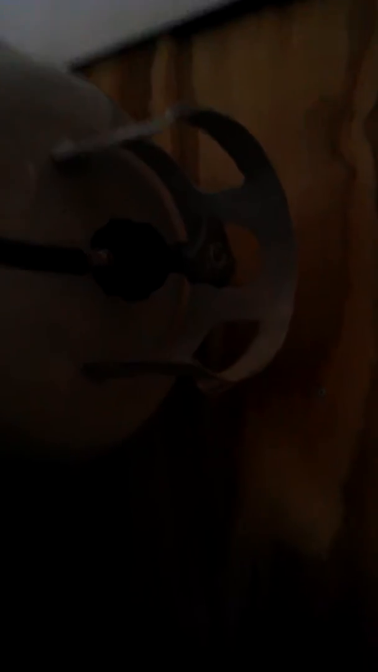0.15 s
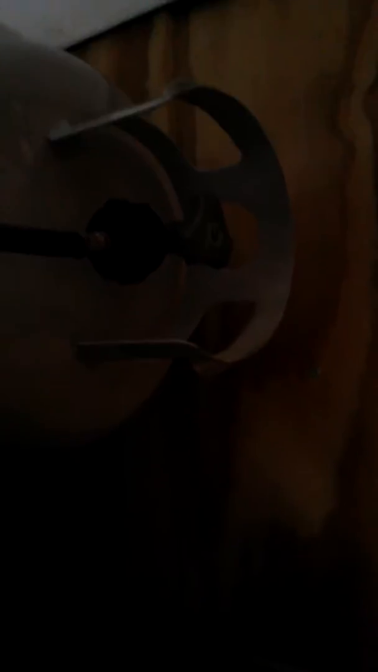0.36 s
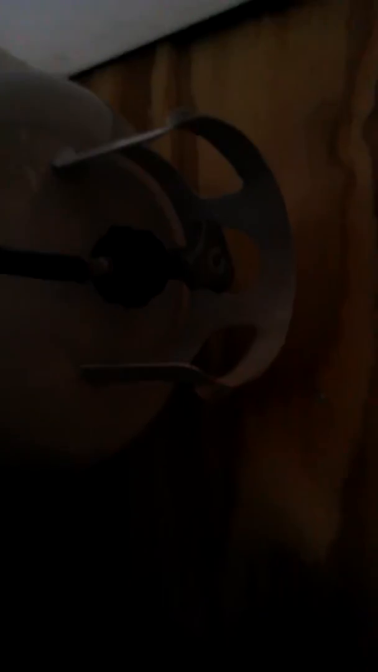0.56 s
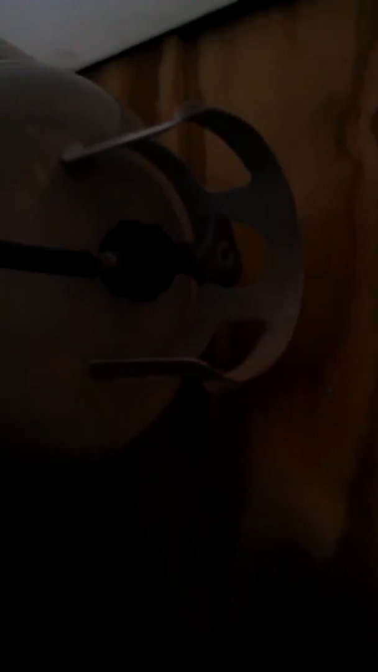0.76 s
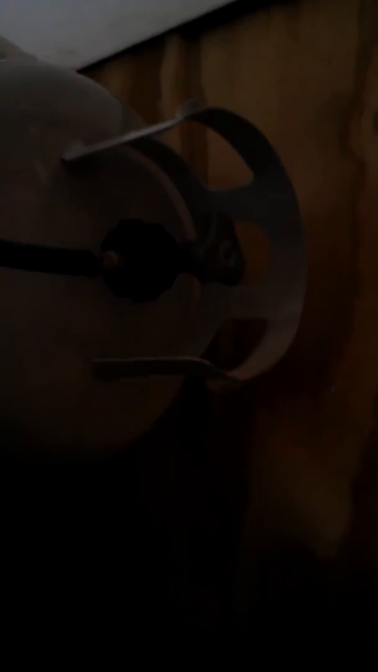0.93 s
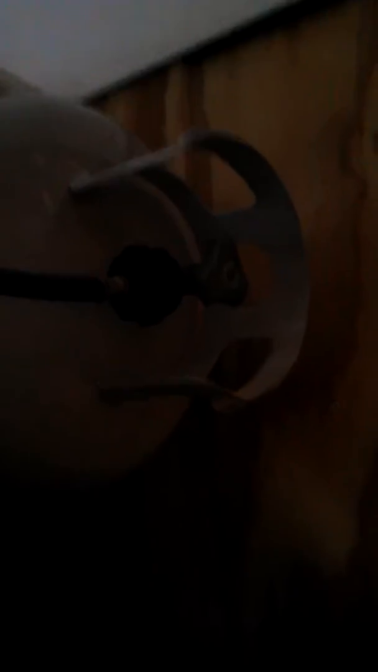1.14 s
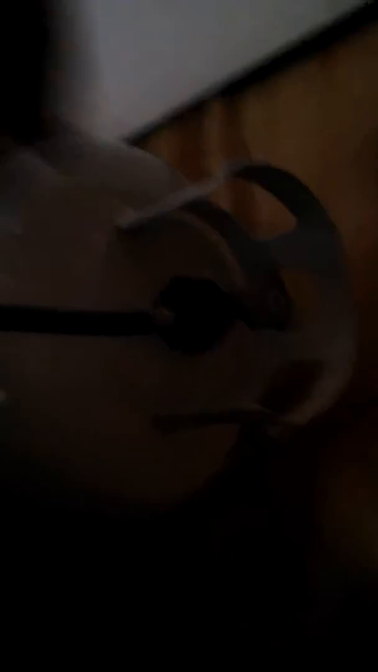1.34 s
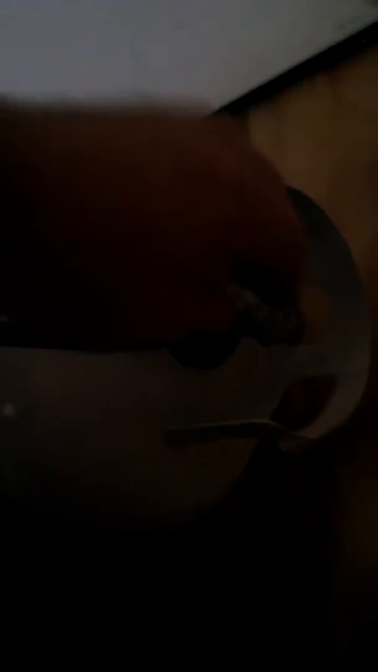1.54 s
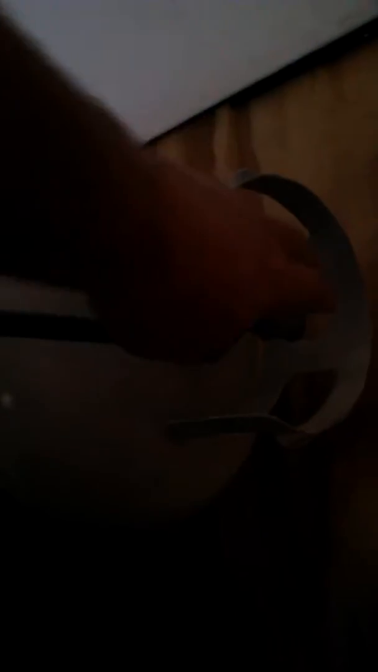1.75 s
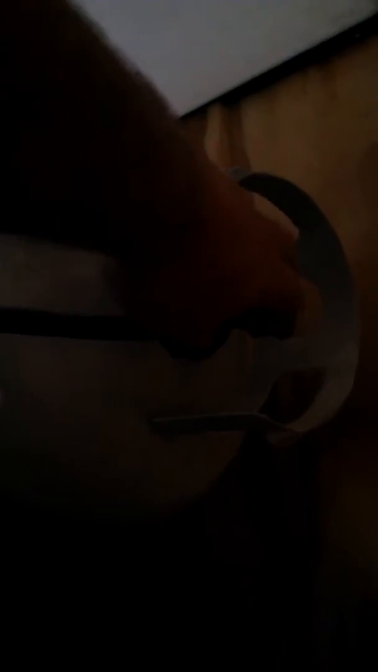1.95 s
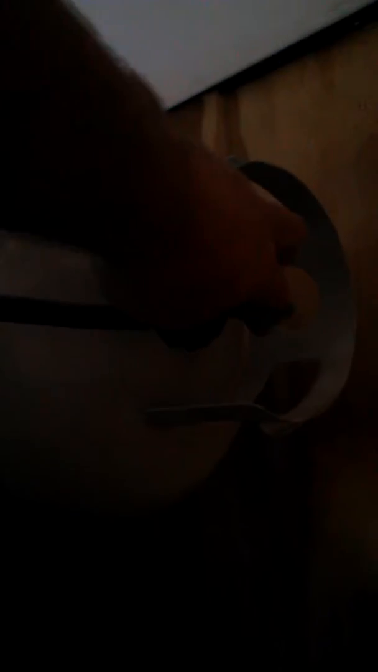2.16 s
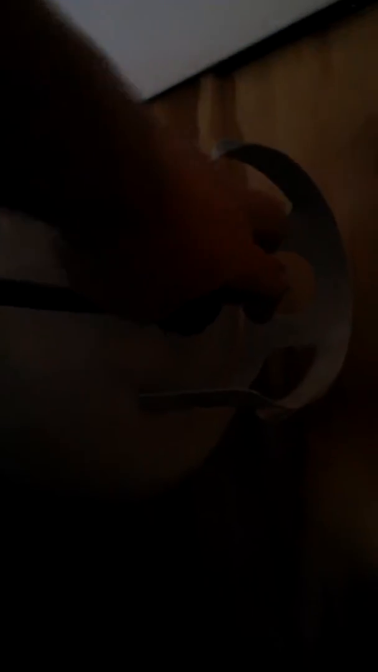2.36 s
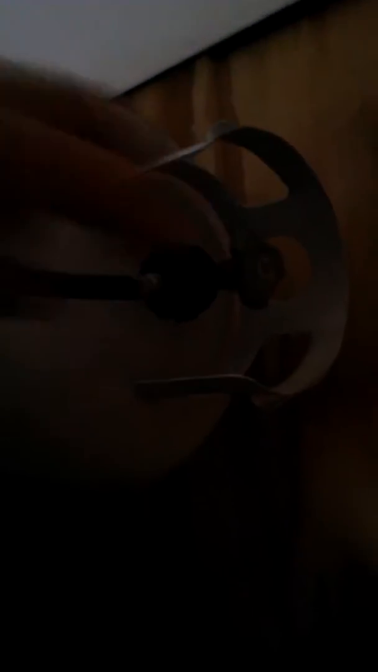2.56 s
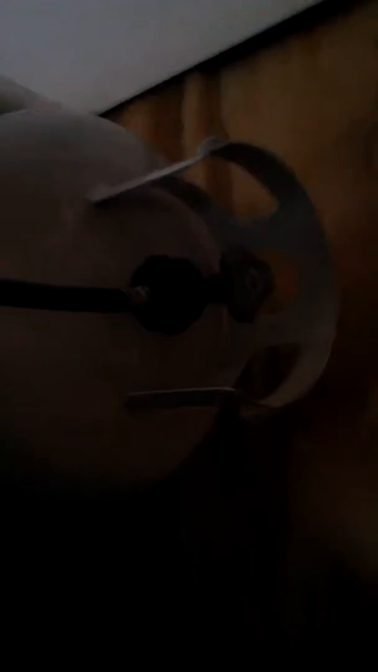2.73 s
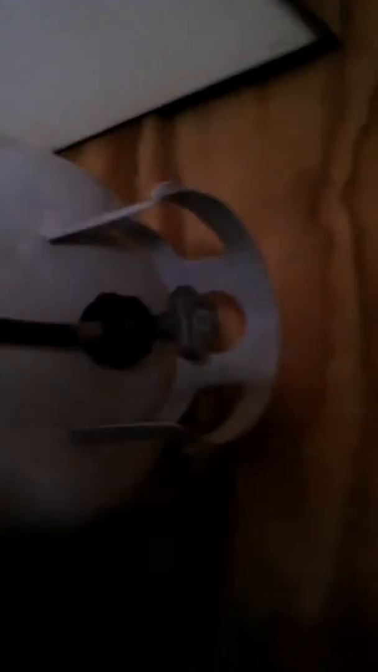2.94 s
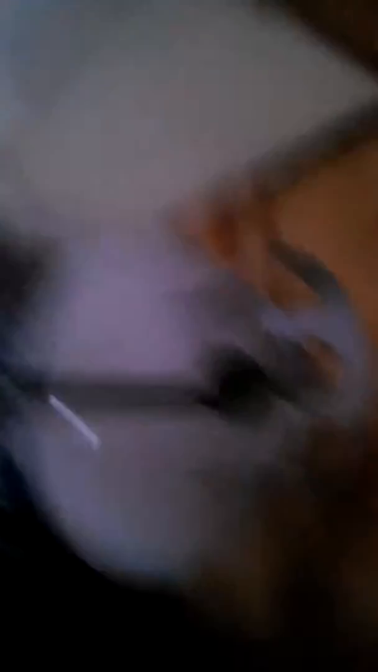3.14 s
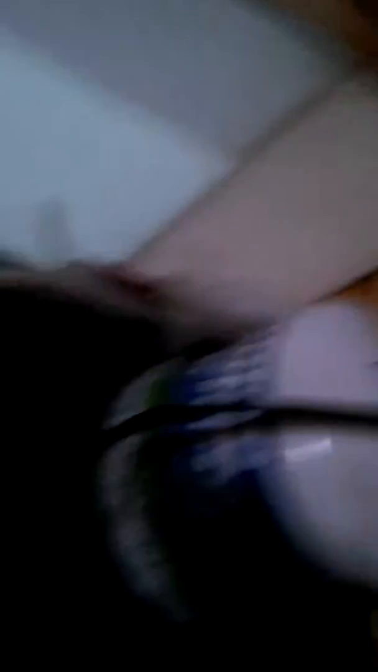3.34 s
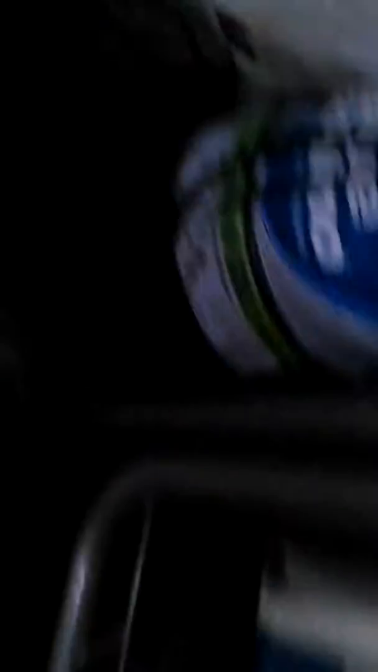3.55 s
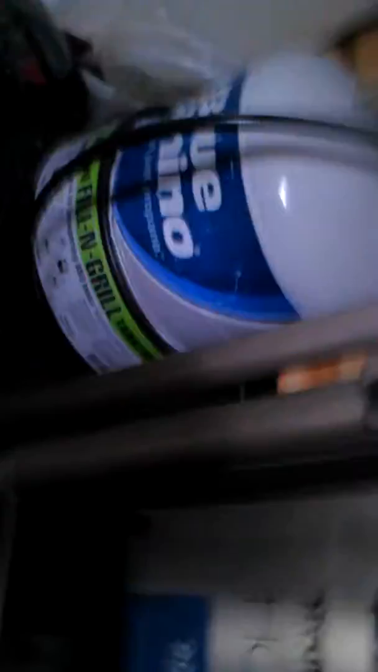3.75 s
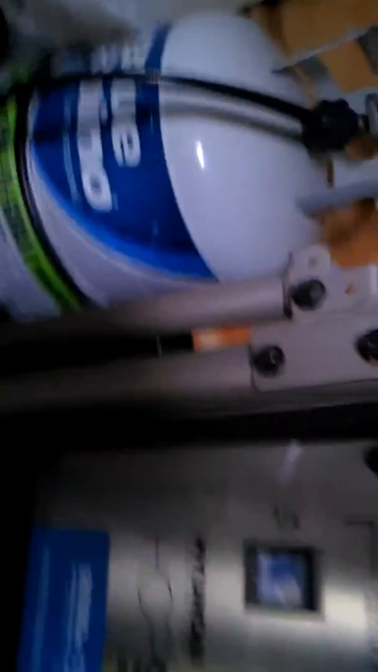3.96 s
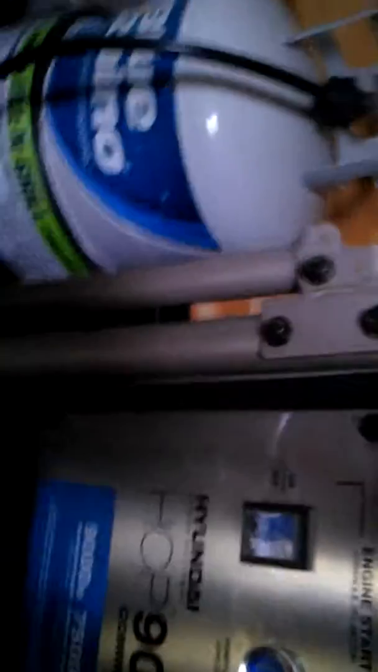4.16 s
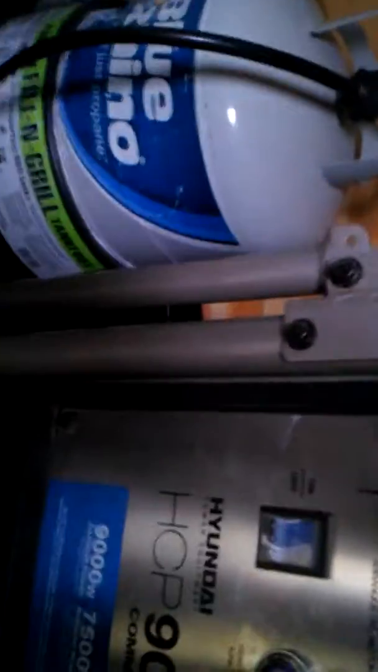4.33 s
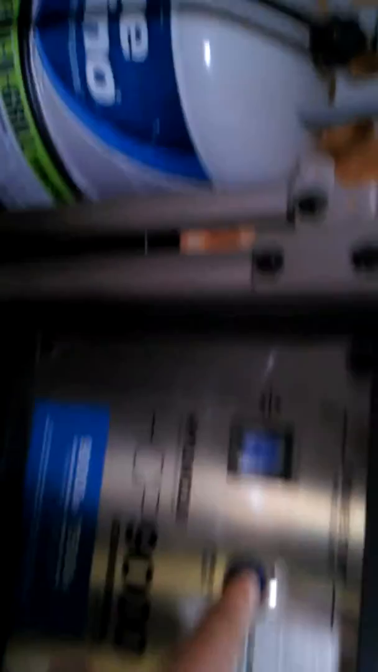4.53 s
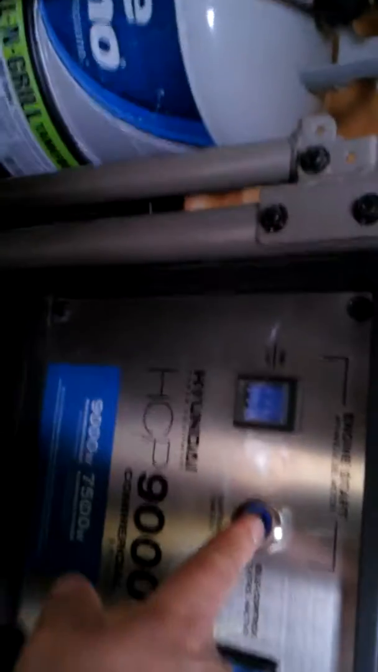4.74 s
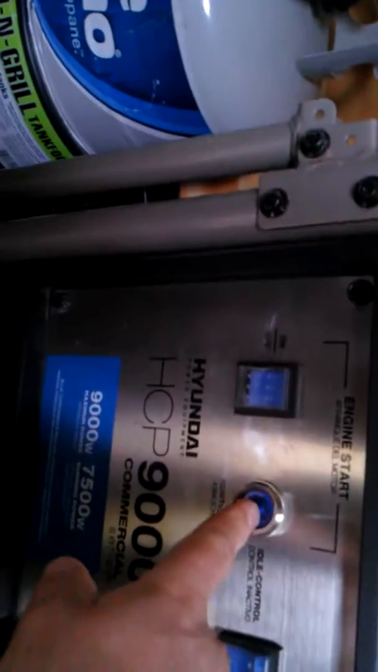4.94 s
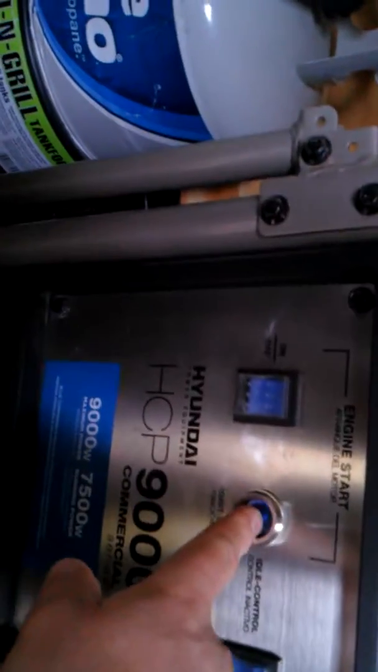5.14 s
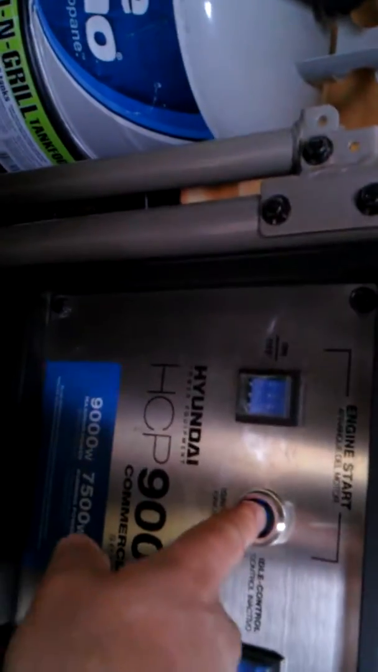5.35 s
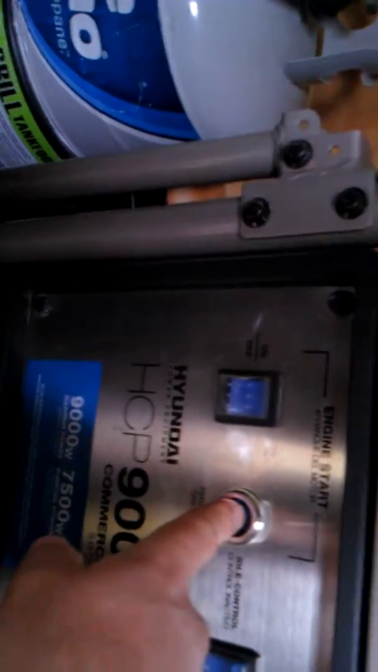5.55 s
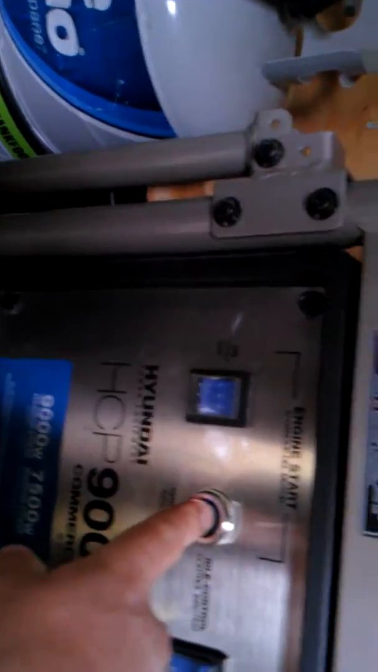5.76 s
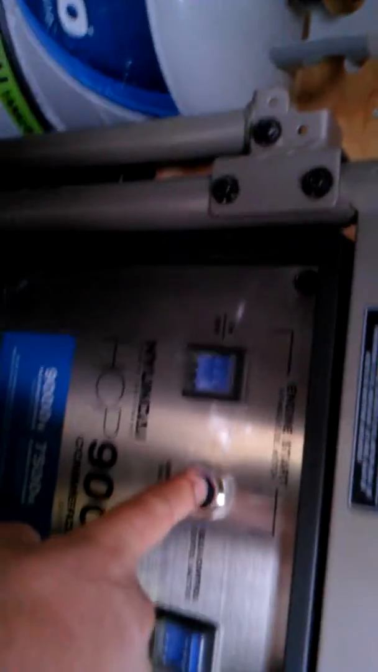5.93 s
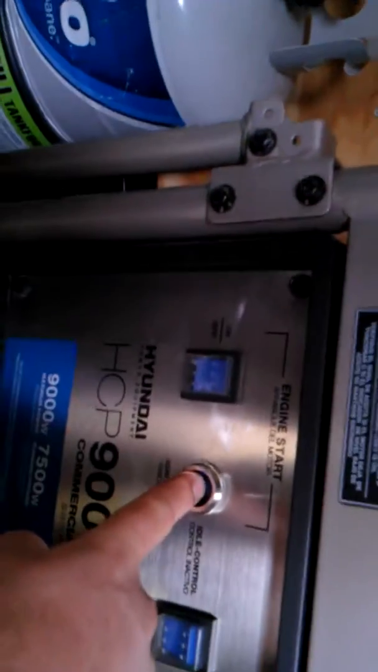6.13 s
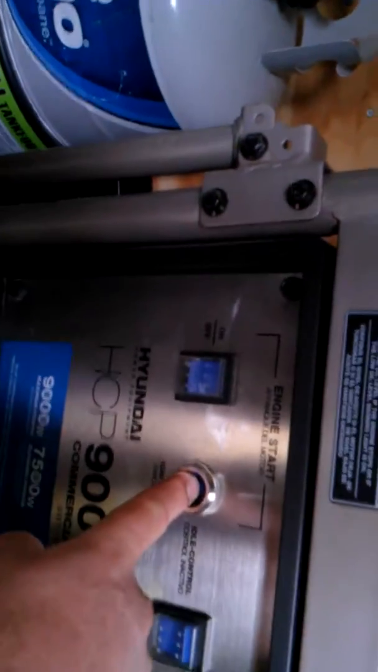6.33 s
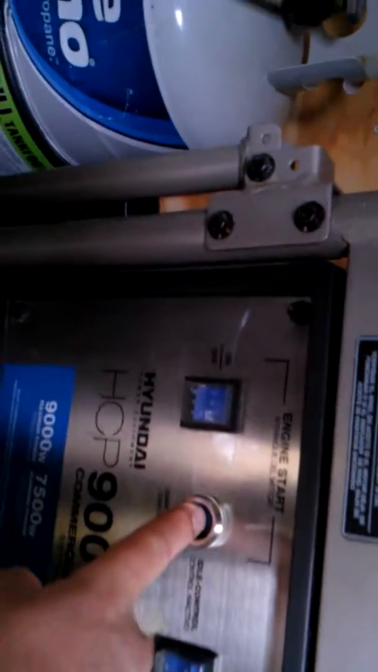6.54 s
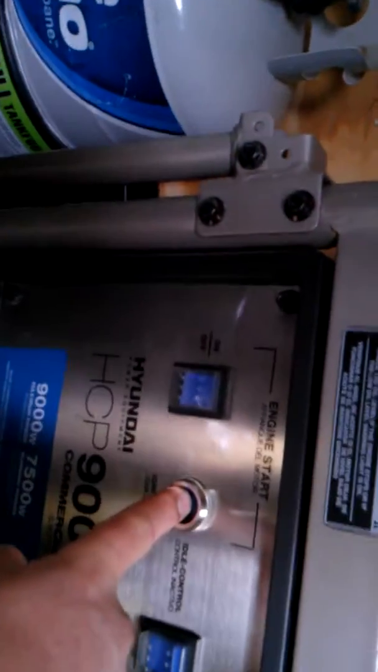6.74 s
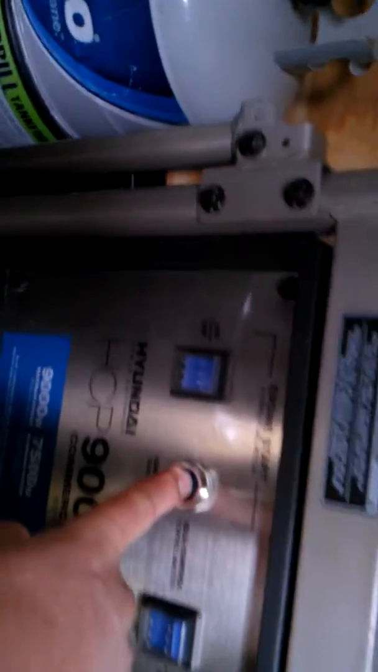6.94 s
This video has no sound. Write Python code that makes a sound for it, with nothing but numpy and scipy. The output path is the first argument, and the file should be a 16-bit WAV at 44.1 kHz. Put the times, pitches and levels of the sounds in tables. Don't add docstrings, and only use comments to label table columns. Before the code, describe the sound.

Close handling clicks and rubbing, a thin valve hiss-whistle, then a hard clunk and a distorted, grinding starter motor cranking without catching.

```python
import sys
import numpy as np
from scipy import signal
from scipy.fft import rfft, irfft, next_fast_len
from scipy.io import wavfile
from scipy.ndimage import uniform_filter1d

SR = 44100
rng = np.random.default_rng(int(sys.argv[2]) if len(sys.argv) > 2 else 0)


def voltage_ratio(decibels):
    exponent = np.asarray(decibels, float) / 20
    return 10 ** exponent


def store_wav(level_fs):
    pcm = np.round(np.clip(np.atleast_2d(level_fs), -1, 1) * 32767)
    wavfile.write(sys.argv[1], SR, pcm.T.astype(np.int16))


N = 308259
T = np.arange(N) / SR
HZ = np.fft.rfftfreq(next_fast_len(N), 1 / SR)
HOP = 1024


def noise():
    return rng.standard_normal(N)


def evened(x):
    return x / np.sqrt(np.mean(x ** 2) + 1e-20)


def coloured(x, points):
    hz, db = np.transpose(points)
    gain = voltage_ratio(np.interp(np.log(HZ + 1), np.log(hz), db, left=-90, right=-90))
    shaped = irfft(rfft(x, next_fast_len(N)) * gain, next_fast_len(N))
    return evened(shaped[:N])


def band(x, lo_hz, hi_hz):
    return signal.sosfilt(signal.butter(3, [lo_hz, hi_hz], "bandpass", fs=SR, output="sos"), x)


def columns(rows):
    s, *rest = np.transpose(rows)
    return [np.interp(T, s, c) for c in rest]


def drift(rate_hz):
    falloff = 1 + (np.fft.rfftfreq(8192, 64 / SR) / rate_hz) ** 2
    coarse = irfft(rfft(rng.standard_normal(8192)) / falloff)
    return evened(np.interp(T, np.arange(8192) * 64 / SR, coarse))


def resonate(x, hz, width_hz):
    return signal.lfilter(*signal.iirpeak(hz, hz / width_hz, SR), x)


def ramp(s, length):
    return np.clip((T - s) / length, 0, 1)


def add(mix, s, sound):
    part = mix[round(s * SR):][:len(sound)]
    part += sound[:len(part)]


def yard():
    # (frequency [Hz], density [dB per Hz])
    floor_colour = [(15, -32), (25, 7.5), (60, -7), (81, -7), (119, 1.5), (306, -12.5), (389, -12),
                    (413, -10.5), (900, -11.5), (1170, -30), (1980, -120)]
    # (frequency [Hz], density [dB per Hz])
    hiss_colour = [(530, -55), (900, -3), (1080, -2), (1390, -7.5), (1690, -9), (2670, -12.5), (2910, -12),
                   (4030, -11), (4180, -11.5), (5720, -15), (6380, -13), (8530, -2), (11100, -12),
                   (15100, -13), (16200, -26)]
    # (frequency [Hz], waver [Hz], level [dB])
    machines = [(53.8, 1.5, -54.5), (131, 4, -57), (210, 1.5, -65), (272, 2, -69), (309, 3, -68),
                (360.7, 2, -68), (7380, 17.2, -66), (8900, 25, -72), (7960, 25, -76), (13050, 25, -83)]
    floor_db, hiss_db = -50, -53
    out = voltage_ratio(floor_db - 3.5) * coloured(noise(), floor_colour)
    out = out + voltage_ratio(hiss_db - 3.0 + 0.5 * drift(0.6)) * coloured(noise(), hiss_colour)
    for hz, waver_hz, db in machines:
        fade_db = -2.5 * T if hz > 5000 else 0
        phase = 2 * np.pi * np.cumsum(hz + waver_hz * drift(8.84)) / SR
        out = out + voltage_ratio(db + 1.5 + 2 * drift(7.4) + fade_db) * np.sin(phase)
    return out


def rustle():
    # (time [s], movement [dB])
    movement = [(0.0, -56), (0.32, -73), (0.69, -51), (1.13, -43), (1.3, -48.5), (1.84, -41), (2.12, -53),
                (2.38, -35), (2.53, -31), (2.63, -32.5), (2.79, -41), (3.11, -33.5), (3.35, -39),
                (3.74, -47), (3.95, -37), (4.28, -44), (4.59, -65), (5.25, -57)]
    # (frequency [Hz], density [dB per Hz])
    fine_colour = [(1530, -53), (2600, -17.5), (3840, -9.5), (6320, -14), (9330, 1), (9770, -1),
                   (10300, -5), (12700, -12.5), (15100, -12), (16200, -21)]
    # (frequency [Hz], density [dB per Hz])
    dull_colour = [(300, -36), (450, 7), (700, 3.5), (1000, 5.5), (1400, 7.5), (1800, 9), (2250, 4),
                   (2500, -2), (3200, -38)]
    fine_db = columns(movement)[0]
    over_db = fine_db + 41.5
    dull_db = -53 - 1.4 * T + 1.56 * np.maximum(over_db, 0)
    rumble_db = -51 + 0.11 * over_db
    flicker_db = 2 * drift(11)
    fine = voltage_ratio(fine_db - 12 + flicker_db) * coloured(noise(), fine_colour)
    dull = voltage_ratio(dull_db - 6 + 0.5 * flicker_db) * coloured(noise(), dull_colour)
    rumble = voltage_ratio(rumble_db - 10) * evened(band(noise(), 28, 290))
    air = voltage_ratio(-65) * ramp(2.5, 0.24) * evened(band(noise(), 2400, 8300))
    return (fine + dull + rumble + air) * (T < movement[-1][0])


def handling():
    # (frequency [Hz], width [Hz], level [dB])
    case_modes = [(525, 140, -23), (760, 260, 16.5), (980, 50, 12), (1200, 490, 16.5), (1650, 290, 18),
                  (1930, 39, 19)]
    # (frequency [Hz], density [dB per Hz])
    tap_treble = [(4500, -51), (6800, -14.5), (9300, 1.5), (10300, -4), (12700, -12), (16200, -18)]
    # (time [s], treble peak [dB], dull peak [dB], decay by 60 dB [s])
    taps = [(0.1053, -26, -30, 0.012), (0.457, -50, -42, .04), (0.7093, -33.5, -45, 0.25),
            (0.931, -36, -53, 0.093), (0.9732, -34, -44, 0.13), (1.0082, -26, -54, 0.059),
            (1.0244, -31, -41, 0.063), (1.062, -37, -53, 0.087), (1.1124, -35, -45, 0.064),
            (1.2635, -38, -46, 0.071), (1.764, -29.5, -39.5, 0.12), (1.8612, -34, -43, 0.058),
            (1.8981, -36, -45, 0.091), (2.644, -21, -30, 0.03), (2.6828, -25, -59, 0.54),
            (2.76, -18, -36, 0.11), (2.795, -29, -42, 0.074), (2.519, -28, -45, .04),
            (3.187, -27, -50, .04), (3.207, -32, -54, .08), (3.6474, -59, -50, 0.046),
            (4.313, -23, -55, 0.015), (4.5332, -31.5, -31.5, 0.16), (4.838, -30.5, -35, 0.072),
            (5.255, -16, -48, 0.021)]
    # (time [s], length [s], treble [dB], dull [dB])
    drags = [(0.868, 0.3, -51.5, -52), (1.942, 0.1, -49, -63), (2.419, 0.079, -41, -50),
             (2.645, 0.031, -46, -51), (2.765, 0.1, -50, -48.5), (3.12, 0.095, -34.5, -64),
             (3.197, 0.052, -40, -71), (3.508, 0.011, -43, -36.5), (3.514, 0.032, -55, -44),
             (3.559, 0.076, -71, -47.5), (3.721, 0.013, -39, -46), (3.732, 0.041, -43, -38.5),
             (3.771, 0.03, -28, -30), (3.819, 0.018, -25.5, -23.5), (3.822, 0.033, -43, -42.5)]
    contact = noise()
    case = sum(voltage_ratio(db) * resonate(contact, hz, w) for hz, w, db in case_modes)
    treble, middle = coloured(contact, tap_treble), evened(band(contact, 1700, 7200))
    colours = np.array([treble, middle, evened(case)])
    gains, t = np.zeros((3, N)), np.arange(SR // 5) / SR
    for s, treble_db, dull_db, t60 in taps:
        shape = (1 - np.exp(-t / 0.00025)) * voltage_ratio(-60 * t / t60)
        for gain, db in zip(gains, (treble_db, dull_db - 4.5, dull_db)):
            add(gain, s, voltage_ratio(db - 9.5) * shape)
    for s, length, treble_db, dull_db in drags:
        middle_db = dull_db + 0.86 * (treble_db - dull_db) - 9
        for gain, db in zip(gains, (treble_db, middle_db, dull_db)):
            add(gain, s, voltage_ratio(db) * signal.windows.tukey(round(length * SR), 0.6))
    return (gains * colours).sum(0)


def knocks():
    # (time [s], level [dB], width [ms])
    pushes = [
        (0.2302, -20.5, 0.5),
        (0.2312, -19.5, 0.2),
        (1.322, -34, 0.13),
        (3.034, -33, 0.17),
        (3.5434, -17, 0.061),
        (3.7378, -28, 0.69),
    ]
    # (time [s], frequency [Hz], width [Hz], level [dB], decay by 60 dB [s])
    ringing_parts = [(.945, 1700, 350, -52, .25), (.985, 1000, 400, -47, .15), (1.0, 1450, 250, -46, 0.13),
                     (1.026, 1370, 120, -41, .08), (1.041, 1810, 300, -51, .2),
                     (3.6, 1100, 200, -39, 0.067), (3.619, 1100, 200, -39, 0.045),
                     (2.765, 820, 60, -47, 0.4), (2.65, 503, 60, -46, .15), (2.912, 120, 80, -39, .1),
                     (3.031, 130, 100, -34, .08), (2.958, 119, 90, -50, 0.5), (3.11, 110, 120, -45, .6),
                     (3.513, 597, 300, -32, 0.04), (3.525, 1200, 250, -34, .03),
                     (3.526, 445, 150, -43, 0.22), (3.583, 447, 150, -37, 0.068),
                     (3.541, 900, 400, -35, 0.05), (3.583, 1160, 250, -45, 0.23),
                     (3.648, 2600, 500, -42, .03), (4.251, 3300, 700, -37.5, 0.024),
                     (4.534, 1490, 200, -45, 0.11), (4.533, 4000, 1200, -39, .04),
                     (4.838, 3200, 300, -46, .09), (4.838, 4150, 350, -41, .05),
                     (4.838, 3700, 300, -45, 0.054), (4.838, 6300, 2500, -36, 0.03),
                     (4.845, 4200, 200, -51, 0.12), (5.2764, 9460, 2450, -1, 0.11),
                     (5.2767, 4220, 4000, -9.5, 0.27), (5.308, 9300, 700, -10, 0.31),
                     (5.325, 6000, 4000, -5.5, 0.14), (5.295, 615, 39.4, -12.5, 0.97),
                     (5.345, 830, 44.6, -8.5, 0.41), (5.285, 1153, 60, -12, 0.44),
                     (5.29, 252, 199, -20.5, 0.82)]
    out, t = np.zeros(N), np.arange(SR // 5) / SR
    for s, db, width_ms in pushes:
        u = (t[:400] * 1000 - 4) / width_ms
        add(out, s - 4 / 1000, voltage_ratio(db) * (1 - 0.5 * u ** 2) * np.exp(-0.5 * u ** 2))
    for s, hz, width_hz, db, t60 in ringing_parts:
        puff = rng.standard_normal(len(t))
        for _ in range(2):
            puff = resonate(puff, hz, 1.13 * width_hz)
        rise = np.minimum(t / 0.002, 1) ** 2
        add(out, s, rise * voltage_ratio(db - 60 * t / t60) * evened(puff))
    return out


def snaps():
    # (time [s], port ring [dB], ring [Hz], ring hold [ms], push [dB])
    case_snaps = [
        (0.2231, -3, 9300, 0.47, 23),
        (0.2237, -8, 7900, 0.4, -40),
        (0.2242, -20, 8500, 0.5, -40),
        (3.1273, -6, 12900, 0.22, -13.5),
        (3.1314, -12, 9800, 0.43, -8),
        (3.267, -4, 8600, 0.093, 16),
        (3.7102, 0, 9500, 0.64, -2),
        (3.7368, 10, 8700, 0.18, 27),
    ]
    out, ms = np.zeros(N), np.arange(300) / SR * 1000
    spring_back = 0.47 * 0.031 / 0.43 * np.exp(-ms / 0.15)
    push = np.convolve(spring_back - np.exp(-ms / 0.0037), [.3, .5, .3])[:len(ms)]
    for s, db, ring_hz, hold_ms, push_db in case_snaps:
        fade = voltage_ratio(-60 * np.maximum(ms - hold_ms, 0) / 0.27)
        uneven = 1 + 0.5 * uniform_filter1d(rng.standard_normal(len(ms)), size=5)
        ring = -np.sin(2 * np.pi * ring_hz * ms / 1000) * fade * uneven
        add(out, s, voltage_ratio(db) * ring + voltage_ratio(push_db) * push)
    return out


def valve():
    out, t = np.zeros(N), np.arange(0, 0.215, 1 / SR)
    rise_s, rise_db, fade_db_per_s = 0.02, 14, 75
    db = -38 - np.maximum(rise_db * (1 - t / rise_s), fade_db_per_s * (t - rise_s))
    add(out, 2.428, voltage_ratio(db) * np.sqrt(2) * np.sin(2 * np.pi * 9798 * t))
    return out


def crank():
    # (time [s], tooth rate [Hz])
    speed = [(5.28, 340.3), (5.385, 483), (5.5, 675), (5.6, 892), (5.68, 905), (5.72, 985), (5.765, 750),
             (5.81, 745), (5.95, 963), (6.1, 1113), (6.19, 1087), (6.245, 870), (6.53, 1150), (6.625, 1115),
             (6.65, 985), (6.69, 915), (6.86, 1075), (6.99, 1150)]
    # (time [s], time until the load is gone [s])
    crank_turns = [
        (5.28, 0.14),
        (5.785, 0.35),
        (6.25, 0.17),
        (6.69, 0.25),
    ]
    load, sag_s = np.ones(N), 0.098
    for s, run_up_s in crank_turns:
        slackening = (1 - ramp(s, run_up_s)) ** 1.5
        load = load + ramp(s - sag_s, sag_s) * (slackening - load)
    return uniform_filter1d(columns(speed)[0], size=900), load


def tooth_tones(tooth_hz, load, turns):
    # (level [dB], extra under full load [dB], slope [dB per octave of speed])
    teeth = [(-16, -0.5, 7.5), (-21.5, 5, 2.5), (-26.5, 4.5, 3), (-31.5, 11.5, 1), (-33.5, 13.5, 0)]
    # (frequency [Hz], gain [dB])
    gearbox = [(330, -28), (480, -6), (600, -6), (760, -12), (900, -6.5), (1500, -5), (2500, -2),
               (4000, -5)]
    # (time [s], multiple [count], change [dB])
    swells = [(5.428, 1, 13), (5.483, 1, 8), (5.65, 1, 8.5), (5.7, 1, 8.5), (5.93, 1, 6.5), (6.13, 1, -4),
              (6.41, 1, 5), (6.7, 1, 8), (6.89, 1, 2), (5.72, 2, 5), (5.79, 2, -0.5), (6.33, 2, 6.5),
              (6.66, 2, 2), (6.75, 2, 4.5), (5.39, 3, 10), (5.435, 3, 14), (5.48, 3, 14), (5.525, 3, 11),
              (5.58, 3, 7), (5.84, 3, 10), (5.89, 3, 8), (6.03, 3, 3.5), (6.25, 3, 4.5), (6.36, 3, 5),
              (6.77, 3, -1), (5.45, 4, 8), (5.5, 4, 4), (5.555, 4, 9), (6.7, 4, -8), (5.54, 2, 7),
              (5.79, 5, 8.5), (5.9, 4, 8), (6.58, 2, 3), (5.56, 1, -7), (5.8, 1, 1), (5.87, 1, 2),
              (6.08, 1, -6.5), (6.19, 1, -1.5), (6.28, 1, 4), (6.345, 1, -10), (6.47, 1, -1), (6.58, 1, 0),
              (6.77, 1, -6), (6.94, 1, -3.5), (5.45, 2, 6), (5.87, 2, -3), (6.02, 1, 4), (6.07, 2, 2.5),
              (6.15, 2, -1), (6.22, 2, 0), (6.41, 2, 10), (6.82, 1, 2), (6.91, 2, -5), (6.97, 2, -4),
              (5.63, 3, 1), (5.96, 3, -6), (6.65, 3, 1), (5.6, 4, 14), (5.67, 4, 13), (5.6, 2, 4.5)]
    tones = []
    for multiple, (db, load_db, slope_db) in enumerate(teeth, 1):
        level_db = db + load_db * load + slope_db * np.log2(tooth_hz / 1000)
        level_db = level_db + np.interp(multiple * tooth_hz, *np.transpose(gearbox))
        level_db = level_db + 1.2 * drift(11)
        for s, swelling, change_db in swells:
            if round(swelling) == multiple:
                level_db = level_db + change_db * np.exp(-((T - s) / 0.027) ** 2)
        uneven_db = 1.9 * drift(29)
        tones.append(voltage_ratio(level_db + 1.5 + uneven_db) * np.cos(2 * np.pi * multiple * turns))
    return tones


def engagement(load):
    # (time [s], body [dB], treble rattle [dB], decay by 60 dB [s])
    pinion_blows = [
        (5.278, -13, 16.5, 0.0084),
        (5.298, -12, -9, 0.2),
        (5.426, -17, -21, 0.17),
    ]
    body_gain = voltage_ratio(-9.5 + 0.5 * load) * ramp(5.29, 0.012)
    rattle_gain = voltage_ratio(-18) * ramp(5.373, 0.18)
    for s, body_db, rattle_db, t60 in pinion_blows:
        blow = ramp(s - t60 / 20, t60 / 20) * voltage_ratio(-60 * np.maximum(T - s, 0) / t60)
        body_gain = body_gain + voltage_ratio(body_db) * blow
        rattle_gain = rattle_gain + voltage_ratio(rattle_db) * blow
    return body_gain, rattle_gain, ramp(pinion_blows[0][0] - 0.0015, 0.011) ** 2


def shaken_panels(force):
    # (frequency [Hz], width [Hz], level [dB])
    shell_modes = [(620, 18.6, -0.5), (805, 24, 4), (917, 13.6, -3.5), (1011, 23, -0.5), (1095, 20.6, 0),
                   (1234, 16, 0.5), (1495, 9.5, 1.5), (1565, 3.7, 7.5), (1734, 15, -4), (1885, 21.6, 4),
                   (1940, 41, -8), (2084, 16, 4), (2175, 21, -7.5),
                   (2300, 8.9, 1), (2455, 27, -0.5), (2516, 14, 5), (2638, 25, 3), (2756, 16, 2),
                   (2943, 22, 1.5), (3100, 36, 3), (3235, 27, -2.5), (3777, 20, 4), (3695, 20, 0.5),
                   (4330, 5.9, 2), (4580, 13, -1), (3405, 24, -2.5)]
    out = np.zeros(N)
    for k, (hz, width_hz, db) in enumerate(shell_modes):
        sign = (-1) ** k
        out += sign * voltage_ratio(db + 2 * drift(7)) * resonate(force, hz, width_hz)
    return out


def treble_rattle(impacts, gain):
    # (frequency [Hz], density [dB per Hz])
    rattle_colour = [(2650, 6), (4500, 2.5), (5430, -3), (6210, 7.5), (7210, 8.5), (7980, 9), (8380, 11.5),
                     (10700, 4), (15200, -2.5), (16200, -92)]
    # (frequency [Hz], width [Hz], share [ratio])
    port_modes = [(8150, 190, 1.2), (8650, 180, .5), (7750, 140, .45), (9250, 200, .25), (9950, 150, .25),
                  (6250, 200, .25)]
    rattle = gain * voltage_ratio(0.64 * drift(27)) * coloured(impacts, rattle_colour)
    return rattle + sum(share * voltage_ratio(2.8 * drift(2.5)) * resonate(rattle, hz, w) for hz, w, share in port_modes)


def starter():
    direct = [.38, 1.2, 1.15, 1.1, .6]
    # (frequency [Hz], density [dB per Hz])
    body_colour = [(20, -9), (70, -13), (180, -14), (300, -9.5), (508, -4.5), (605, -3), (740, -6),
                   (788, -0.5), (1060, 1), (1330, -1.5), (1940, 2.5), (6000, -11), (7800, -75),
                   (13200, -120)]
    tooth_hz, load = crank()
    body_gain, rattle_gain, engage = engagement(load)
    turns = np.cumsum(tooth_hz * (1 + 0.014 * drift(90))) / SR
    tones = tooth_tones(tooth_hz, load, turns)
    whine, airborne = sum(tones), np.dot(direct, tones)
    impacts = (0.5 + np.exp(-(turns % 1) / 0.31)) * noise()
    clatter = voltage_ratio(-4.5) * body_gain * coloured(impacts, body_colour)
    panels = shaken_panels(1.6 * whine + clatter)
    rattle = treble_rattle(impacts, rattle_gain)
    drive_db = 8
    return voltage_ratio(drive_db) * engage * (airborne + 0.6 * clatter + 1.094 * panels + rattle)


def scene():
    mono = yard() + rustle() + handling() + knocks() + snaps() + valve() + starter()
    return np.tile(mono, (2, 1))


def starved(x):
    # (frequency [Hz], threshold [dB])
    holes = [(3000, -14), (5800, -3.5), (8000, -9), (11000, -3.5), (13000, -1.8), (16000, -1.5)]
    hz, _, z = signal.stft(x, SR, nperseg=2 * HOP, noverlap=3 * HOP // 2)
    power = uniform_filter1d(abs(z) ** 2, size=3, axis=1)
    near = uniform_filter1d(power, size=7, axis=0)
    wide = uniform_filter1d(power, size=61, axis=0)
    edge = voltage_ratio(2 * np.interp(hz, *np.transpose(holes), left=-90))[:, None]
    thinned = np.where(near < edge * wide, 0.14 * z, z)
    return signal.istft(thinned, SR, nperseg=2 * HOP, noverlap=3 * HOP // 2)[1][:N]


def splits():
    # (centre time [s], middle frequency [Hz])
    patches = [(5.545, 5250), (5.545, 11100), (5.614, 5550), (5.614, 9700), (5.661, 4800), (5.777, 5000),
               (5.8, 9700), (5.8, 15300), (6.032, 8600), (6.056, 6350), (6.148, 14500), (6.218, 10400),
               (6.288, 4800), (6.566, 5500), (6.566, 7300), (6.566, 9000), (6.566, 11100), (6.636, 7000),
               (6.799, 9000), (6.961, 9650)]
    # (frequency [Hz], level [dB])
    patch_level = [(4000, -3), (6500, -8), (8500, 2.5), (10500, -8.5), (15500, -22)]
    grid, width_hz = 785, 1800
    side, n = np.zeros(N), np.arange(2 * HOP) + 0.5 + HOP / 2
    window = signal.windows.kaiser_bessel_derived(2 * HOP, 4 * np.pi)
    for s, hz in patches:
        first = (hz - width_hz // 2) * 2 * HOP // SR
        last = (hz + width_hz // 2) * 2 * HOP // SR
        bins = np.arange(first, last) + 0.5
        patch = np.cos(np.pi / HOP * np.outer(n, bins)) @ rng.standard_normal(len(bins))
        start = grid + HOP * (round((s * SR - grid) / HOP) - 1)
        db = np.interp(hz, *np.transpose(patch_level)) - 15.5
        add(side, start / SR, voltage_ratio(db) * evened(patch) * window)
    return side


def top_cut(x):
    return signal.sosfilt(signal.butter(12, 15950, fs=SR, output="sos"), x)


def record(dry):
    ceiling, knee = 0.72, 6.0
    x = dry / (1 + abs(dry / ceiling) ** knee) ** (1 / knee)
    x = signal.lfilter([1, -.05], [1 - .05], x)
    low_pass = signal.firwin(255, 16400, window=("kaiser", 9), fs=SR)
    x = signal.oaconvolve(x, low_pass[None], "same")
    return top_cut(starved(x[0]) + splits() * [[1], [-1]])


dry = scene()
out = record(dry)
store_wav(out)
```